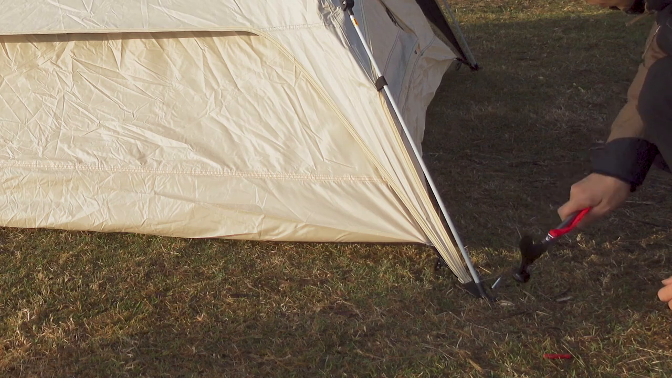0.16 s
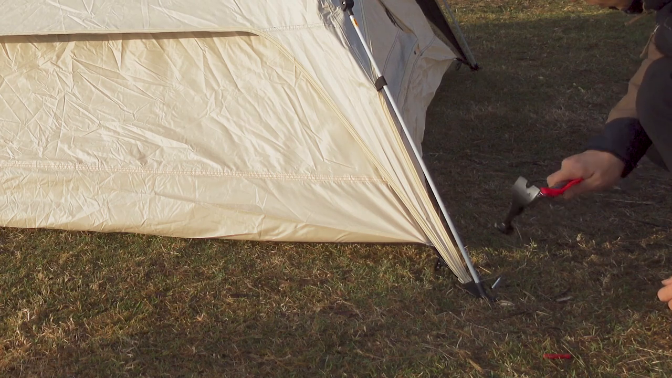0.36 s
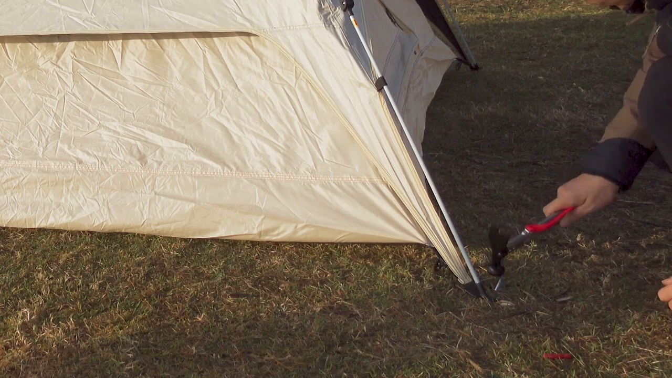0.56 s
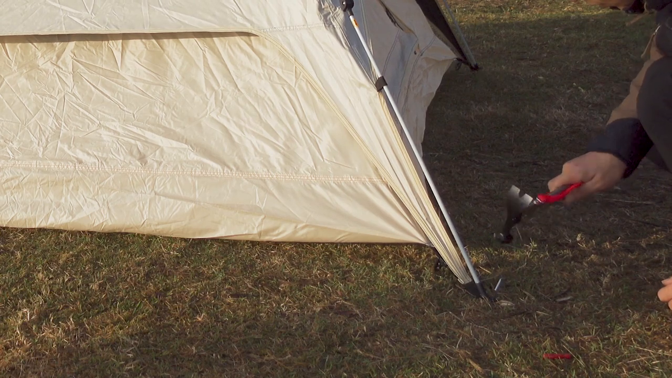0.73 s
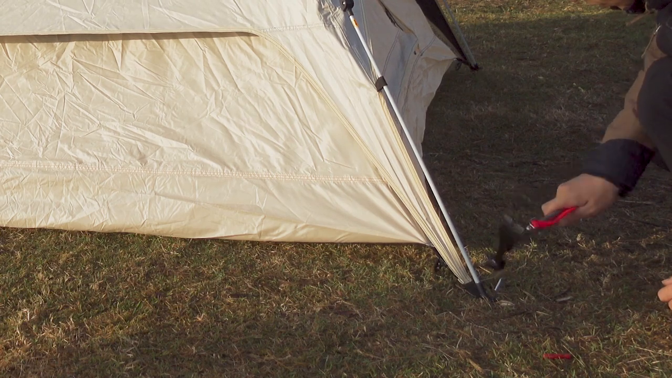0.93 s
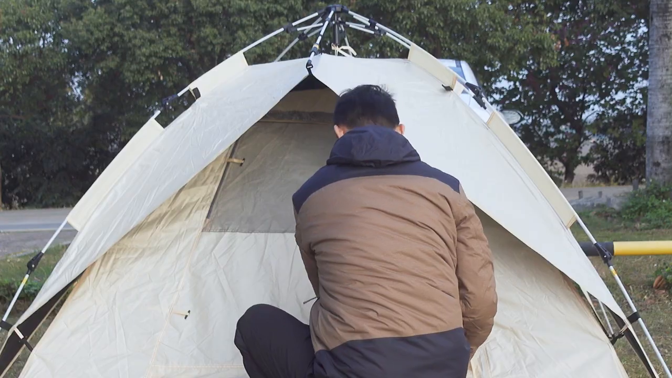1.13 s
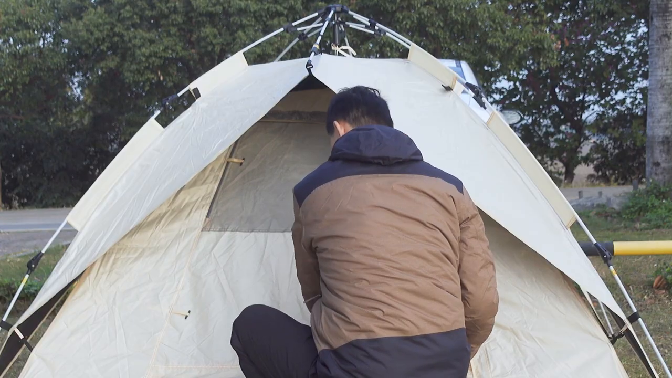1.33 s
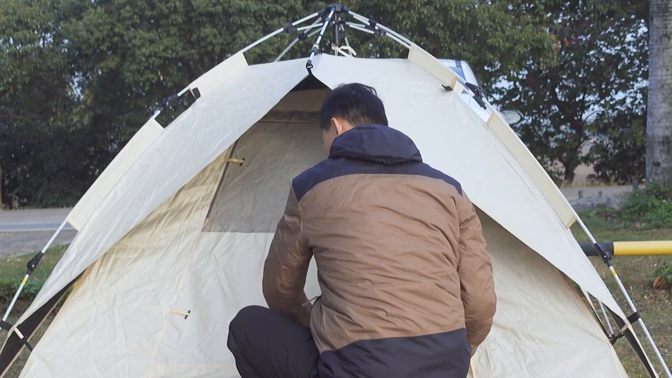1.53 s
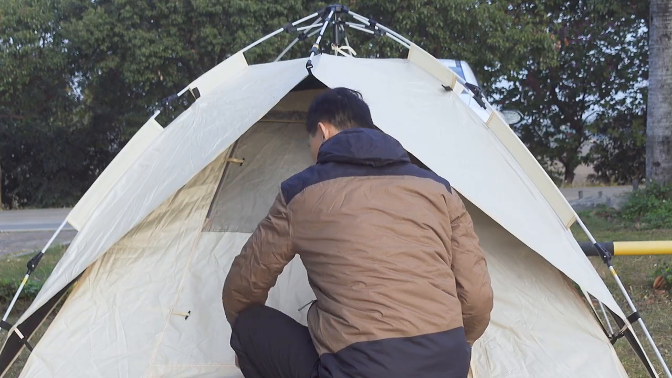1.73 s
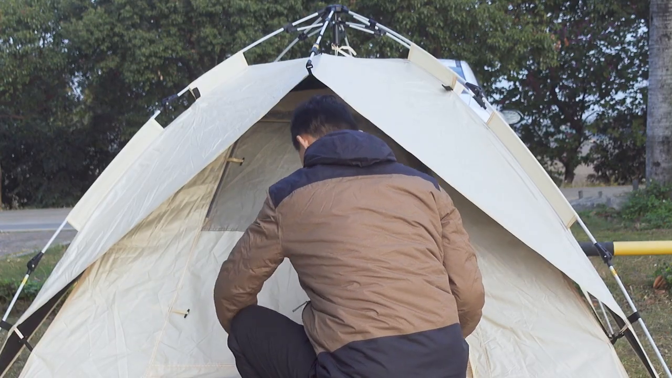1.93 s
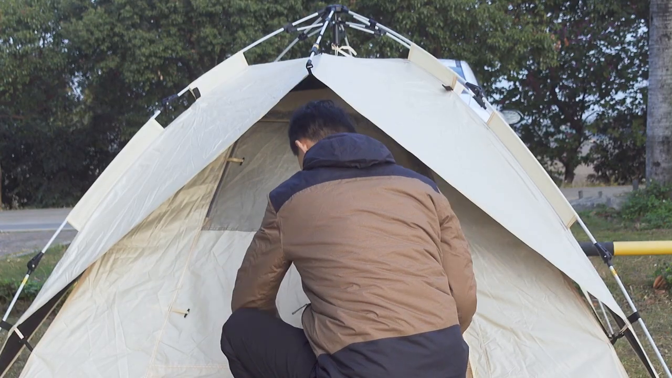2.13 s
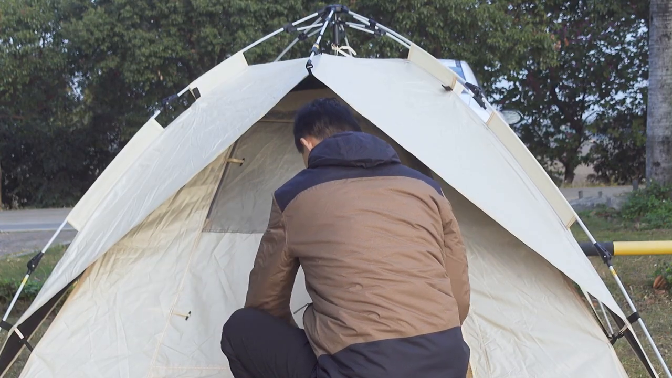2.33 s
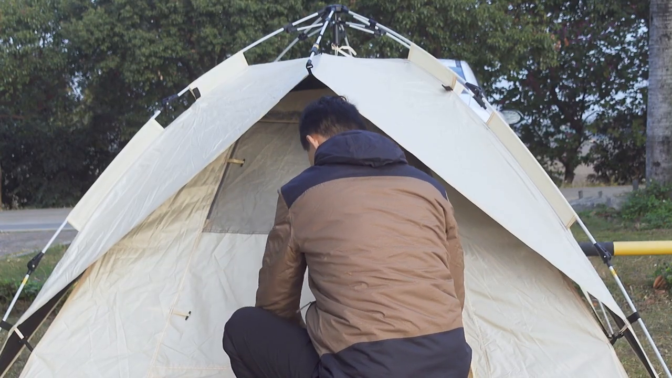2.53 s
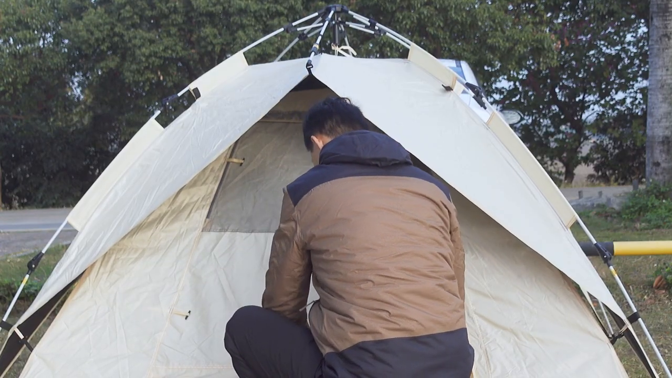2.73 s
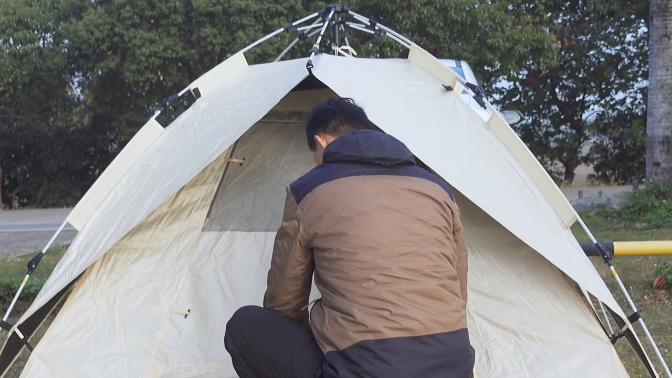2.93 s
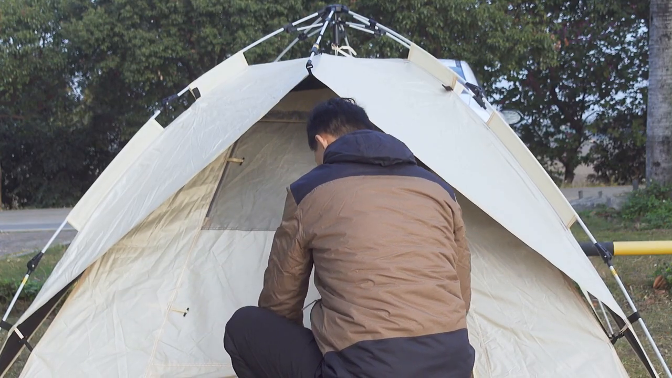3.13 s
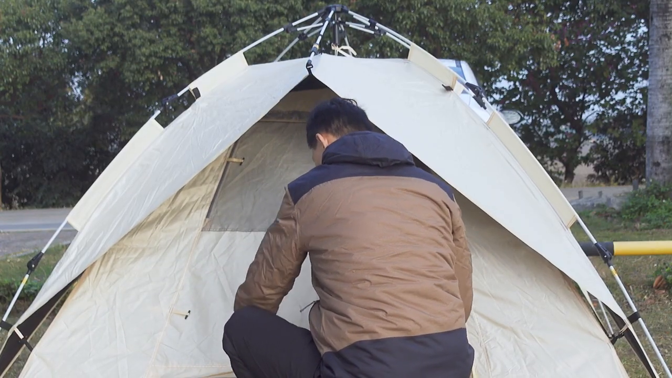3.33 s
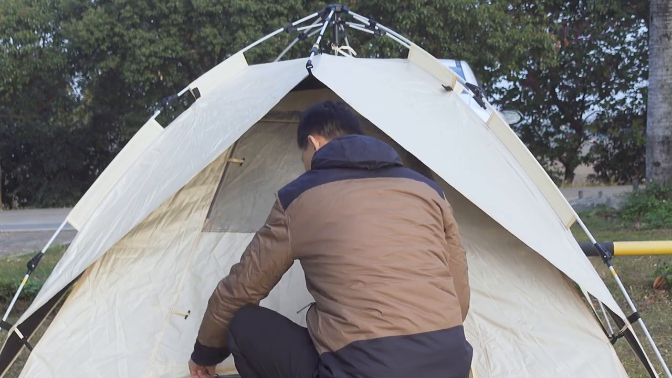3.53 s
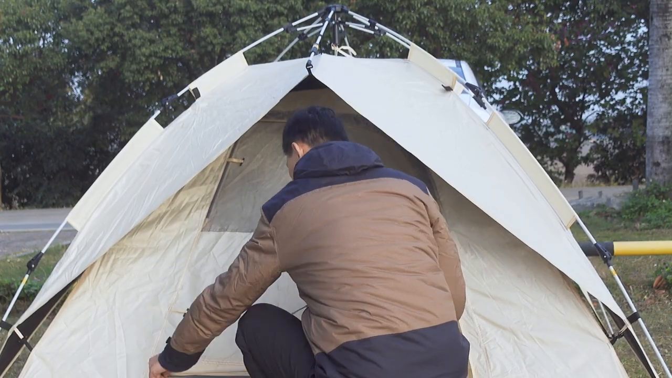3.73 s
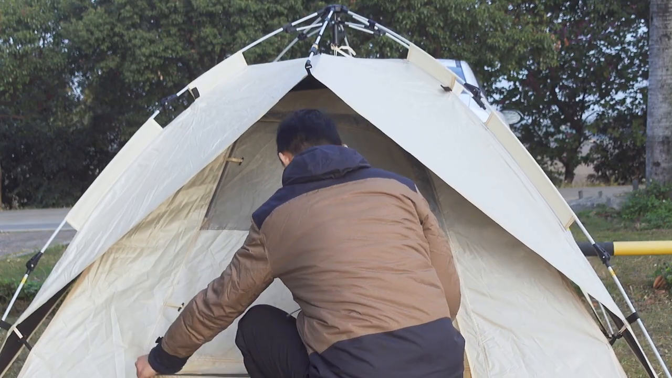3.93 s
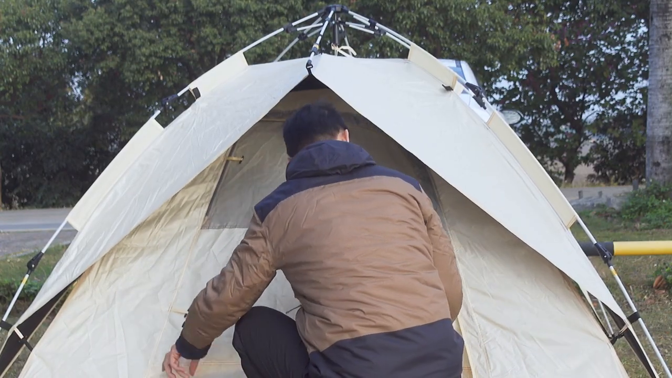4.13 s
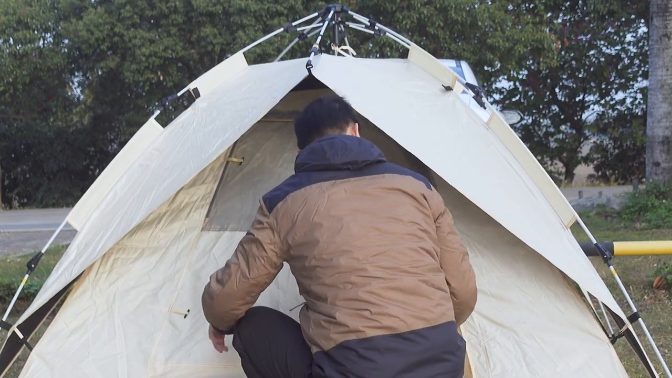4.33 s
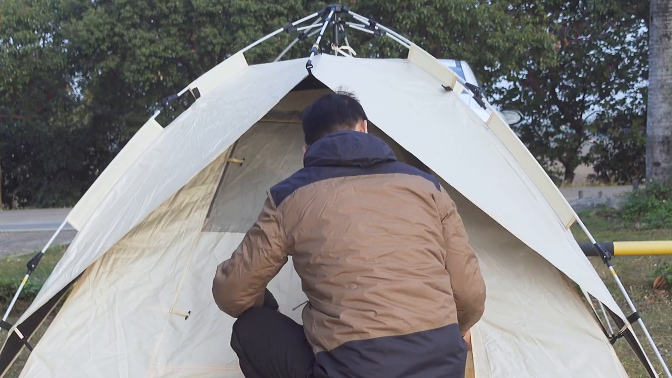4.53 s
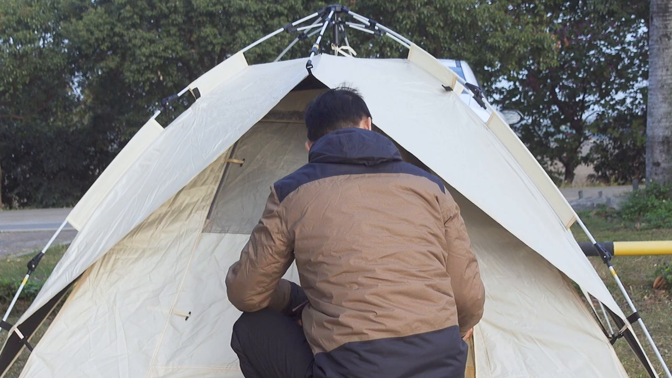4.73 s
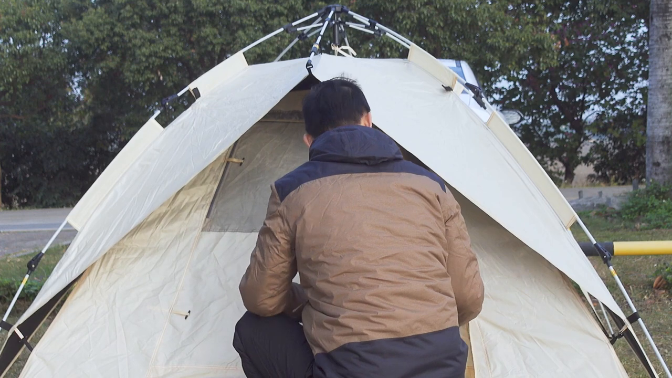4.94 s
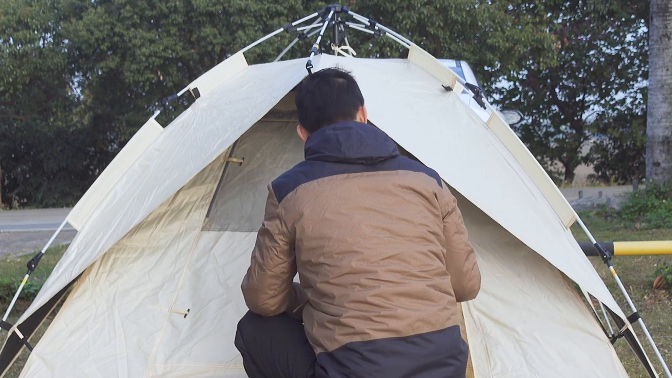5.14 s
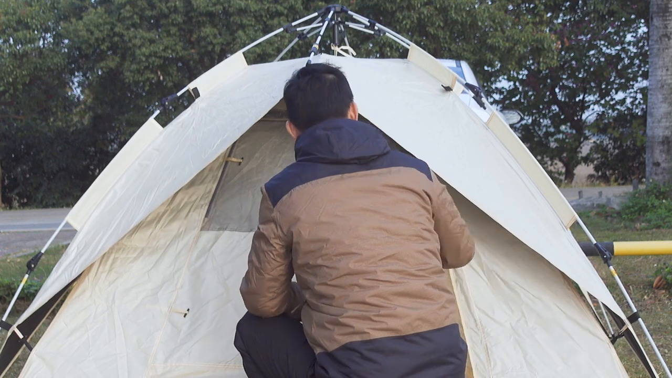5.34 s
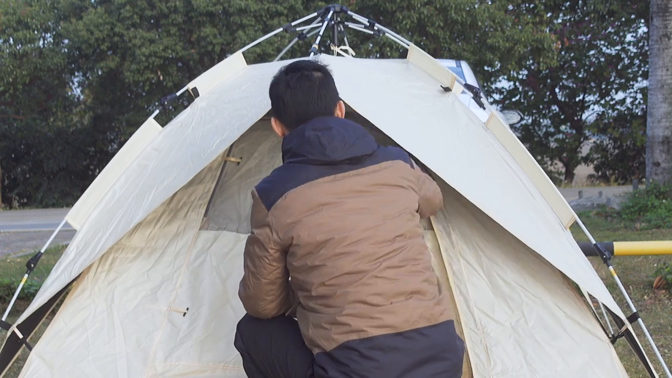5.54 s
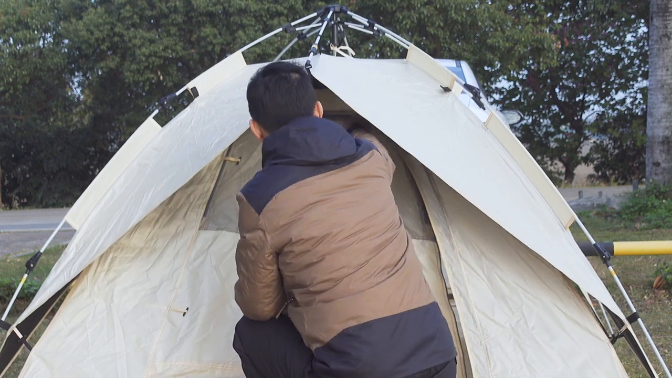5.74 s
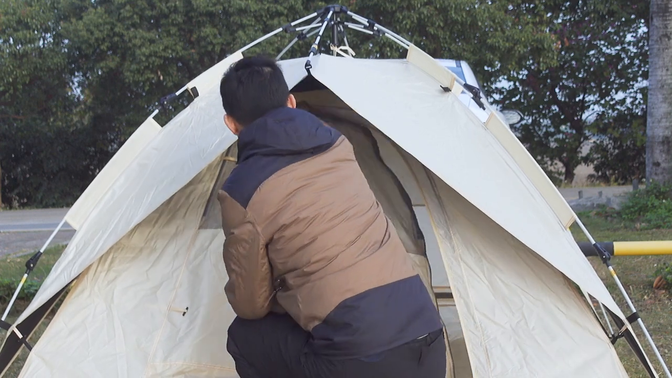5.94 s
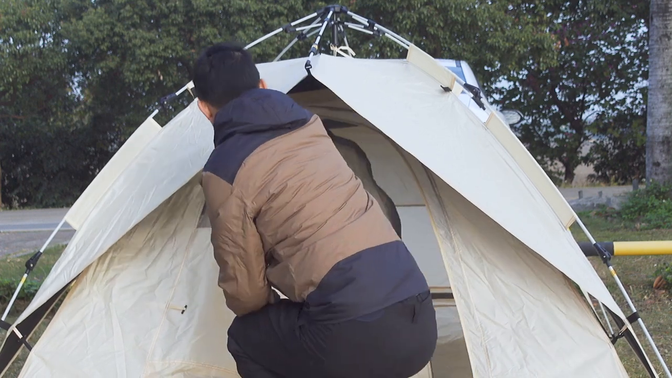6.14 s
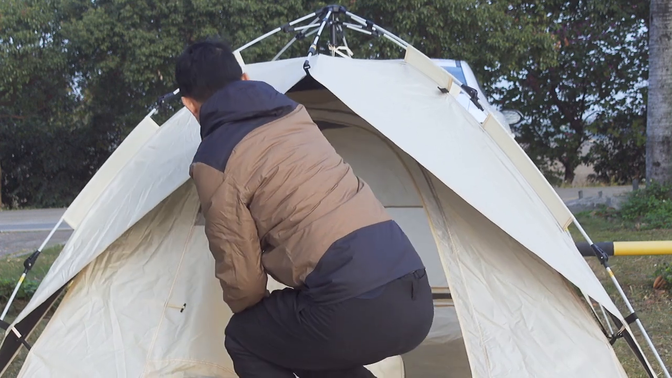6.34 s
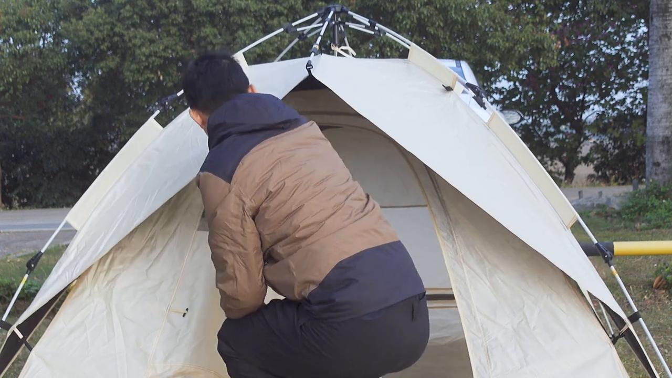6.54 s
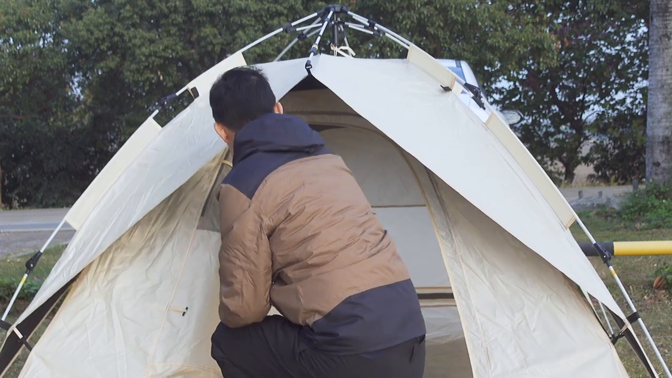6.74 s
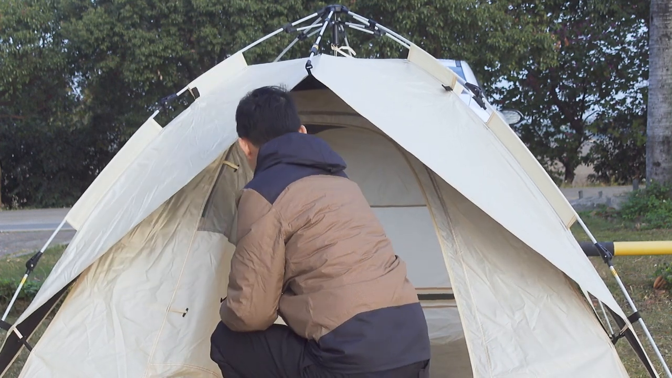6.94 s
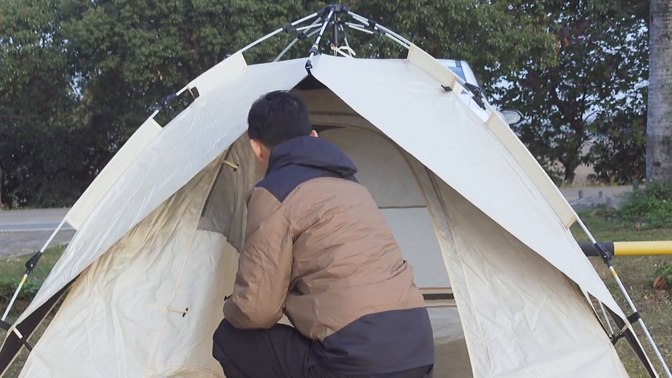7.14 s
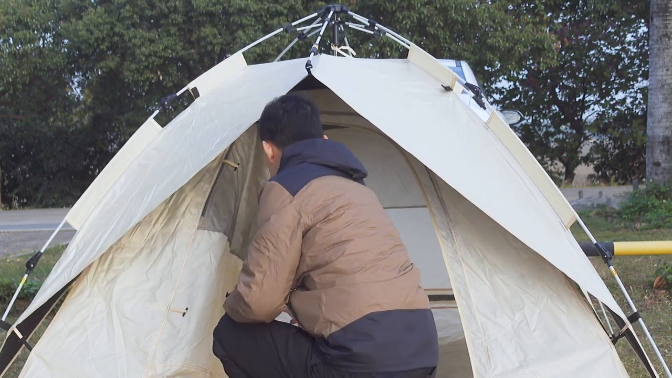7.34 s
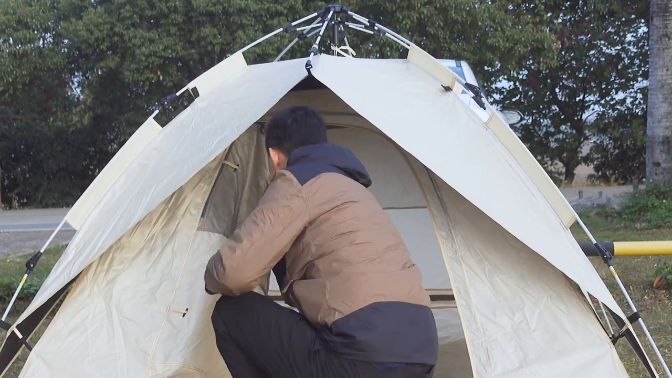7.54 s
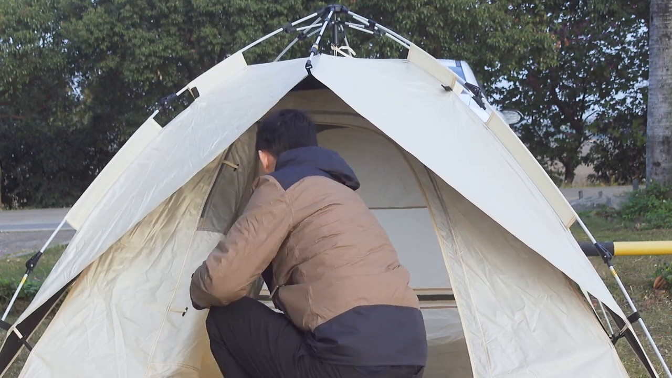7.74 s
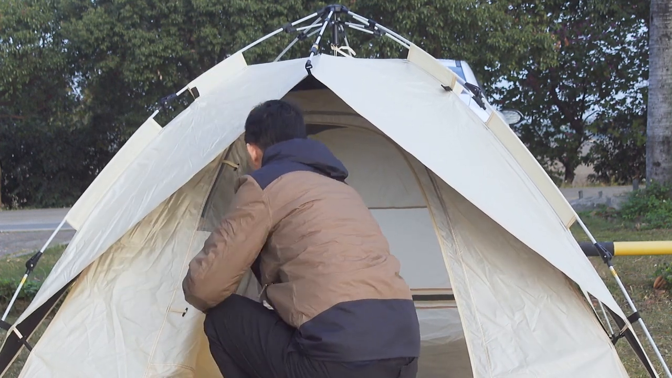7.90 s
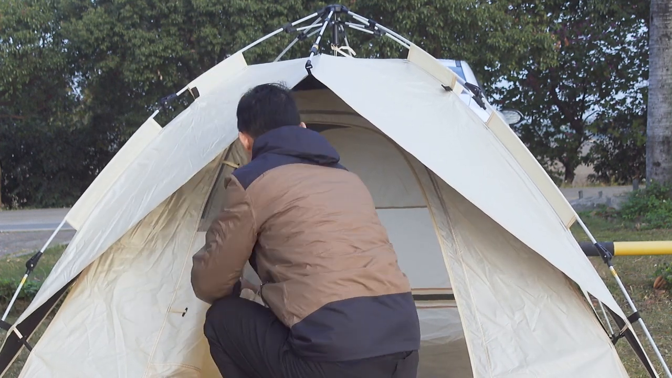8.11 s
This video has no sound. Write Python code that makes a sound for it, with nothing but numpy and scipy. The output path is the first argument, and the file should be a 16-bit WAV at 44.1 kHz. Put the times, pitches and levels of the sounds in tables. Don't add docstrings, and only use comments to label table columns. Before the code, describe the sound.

Loud metallic stake strikes outdoors cut abruptly to soft tent handling: rustling fabric, crisp little creases and three buzzing zip pulls over a low hum.

```python
import sys
import numpy as np
from scipy import signal
from scipy.fft import rfft, irfft
from scipy.io import wavfile
from scipy.ndimage import uniform_filter1d

SR = 44100
rng = np.random.default_rng(int(sys.argv[2]) if len(sys.argv) > 2 else 0)


def output_pcm(signal):
    pcm = np.clip(np.atleast_2d(signal).T, -1, 1) * 32767
    wavfile.write(sys.argv[1], SR, np.round(pcm).astype(np.int16))


def invert_db(x):
    u = np.asarray(x, float) / 20
    return 10 ** u


N = 360297
TIME = np.arange(N) / SR
SCENE_CHANGE_S = 1.101

BLOW_S = [.1567, .6332, 1.0709]
# [f/Hz, level/dB]
WEAVE = [(8000, -16), (9200, 1.5), (11500, 0), (13500, 4.5), (14800, 7), (16000, 1.5)]


def unit(x):
    return x / np.sqrt(np.mean(x ** 2))


def colour(x, points):
    hz, db = np.transpose(points)
    bins = np.maximum(np.fft.rfftfreq(len(x), 1 / SR), 1)
    gain = invert_db(np.interp(np.log(bins), np.log(hz), db))
    return unit(irfft(rfft(x) * gain, len(x)))


def walk(rate):
    hold = int(SR / rate)
    steps = np.repeat(rng.standard_normal(N // hold + 1), hold)
    smooth = uniform_filter1d(uniform_filter1d(steps, hold), hold)
    return unit(smooth[:N])


def add(out, sound, s):
    i = int(s * SR)
    out[i:i + len(sound)] += sound[:N - i]


def grit(spread_db):
    slip_size = np.minimum(rng.exponential(1, N), 7)
    return rng.standard_normal(N) * invert_db(spread_db * slip_size)


def wind():
    # [t/s, rise/s, level/dB]
    puffs = [(0.037, 0.043, -48.5), (.18, 0.077, -44), (.52, 0.1, -49), (.61, .08, -40),
             (.68, 0.036, -54.5), (.87, 0.052, -57.5), (.97, 0.0214, -57), (1.074, 0.026, -48)]
    # [f/Hz, level/dB]
    rumble = [(24, -39), (40, -2.5), (203, -1), (247, -8), (279, -5.5), (460, -19), (713, -47),
              (1500, -52.5), (1950, -89.5), (3300, -120)]
    # [f/Hz, level/dB]
    hiss = [(290, -25), (500, -2.5), (561, -7.5), (667, -12.5), (2280, -21.5), (2830, -15.5), (2950, -21.5),
            (15800, -29.5)]
    breeze_db, fall_s = -58, 0.054
    field_db, hiss_in_puff_db = -69, -27.5

    push = invert_db(breeze_db)
    for s, rise, db in puffs:
        growing = np.clip(1 + (TIME - s) / rise, 0, 1)
        dying = np.exp((s - np.maximum(TIME, s)) / fall_s)
        push = push + invert_db(db) * np.where(TIME < s, growing, dying)
    gusty = invert_db(2.5 * walk(45))
    buffets = push * gusty * colour(rng.standard_normal(N), rumble)
    hiss_level = invert_db(field_db + 1.5 * walk(3.4)) + invert_db(hiss_in_puff_db) * push
    return buffets + hiss_level * colour(rng.standard_normal(N), hiss)


def country_hum():
    # [f/Hz, level/dB]
    hum = [(18, -49), (30, -3), (93, 1), (193, 1), (343, -6.5), (1060, -25.5), (1610, -25.5), (3360, -24),
           (3830, -29), (7760, -29), (12400, -53), (14600, -48.5), (15800, -37.5)]
    level_db = -53.5
    return invert_db(level_db + 0.73 * walk(2.3)) * colour(rng.standard_normal(N), hum)


def scuffs():
    # [t/s, length/s, centre f/Hz, width/Hz,
    # level/dB]
    drags = [(1.239, 0.11, 352.6, 300, -49), (1.701, 0.027, 1510, 2650, -40.5),
             (2.145, 0.16, 1470, 250, -52.5), (2.979, 0.096, 336, 294, -48), (4.648, 0.46, 845, 400, -60),
             (7.506, 0.28, 2600, 900, -56), (7.685, 0.066, 600, 503, -47.5), (8.036, 0.15, 358, 400, -51)]
    out = np.zeros(N)
    for s, length, hz, width, db in drags:
        swell = np.sin(np.pi * np.clip((TIME - s) / length, 0, 1) ** .6)
        band = [(hz / 3, -40), (max(hz - width / 2, hz / 2), -3), (hz + width / 2, -3), (hz + 3 * width, -30)]
        out += invert_db(db) * swell * colour(grit(3.0), band)
    return out


def ticks():
    # [t/s, knock level/dB, snap above knock/dB, spit above knock/dB]
    clear_ticks = [(1.253, -37, -10, -13), (1.348, -34, -1, -13), (1.778, -36.5, -3.5, -12.5),
                   (1.897, -44, -2.5, 6), (2.517, -50, 13, 7), (2.541, -43.5, 10.5, 17),
                   (2.874, -39.5, -0.5, -16), (2.929, -38.5, 1, -14), (2.961, -50, -9, -10.5),
                   (2.978, -39, 0, -7.5), (3.039, -33, -11, -19), (3.099, -45.5, -4, -18.5),
                   (3.991, -31, -9, -24.5), (4.034, -49.5, 0.5, -19), (4.065, -33, -8, -10.5),
                   (4.111, -39.5, 3, -21), (4.179, -43, 2, -15), (4.237, -33.5, -11, -22.5),
                   (4.337, -49, 4, -15), (4.505, -50, 6, -18), (5.119, -37.5, -13.5, -15),
                   (5.812, -38, -6, -21), (6.727, -30, -15, -27), (7.097, -35.5, -12, -27),
                   (7.194, -46, -7.5, -21), (7.25, -39, -15, -22), (7.357, -35.5, -9.5, -30),
                   (7.403, -41.5, -12.5, -20.5), (7.982, -31.5, 4, -19.5), (8.047, -28.5, -5.5, -19)]
    # [f/Hz, level/dB]
    snap_colour = [(1000, -41), (2000, 2.5), (3300, 2), (5000, -3.5), (7000, 1), (9000, -22)]
    knock_low_hz, knock_octaves = 474, 1.83
    small_per_s, small_db, small_spread_db = 45, -48.5, 2.5
    small_snap_db, small_spit_db = -10, -22

    when = np.arange(SCENE_CHANGE_S + .12, N / SR - .05, 1 / small_per_s)
    small_ticks = []
    for s, (a, b, c, d) in zip(when, rng.standard_normal((len(when), 4))):
        late = abs(a) / small_per_s
        small_ticks.append((s + late, small_db + small_spread_db * b, small_snap_db + 3 * c, small_spit_db + 4 * d))

    out, t = np.zeros(N), TIME[:SR // 40]
    fast = np.exp(-t / .001)
    for s, db, snap_db, spit_db in list(clear_ticks) + small_ticks:
        hz = knock_low_hz * 2 ** (knock_octaves * rng.random())
        noise = rng.standard_normal(len(t))
        knock = np.sin(2 * np.pi * hz * t) * np.exp(-t * hz / 1.2)
        snap = colour(noise, snap_colour) * fast
        spit = colour(noise, WEAVE) * fast ** 2
        snap = invert_db(snap_db + 6) * snap / abs(snap).max()
        spit = invert_db(spit_db + 6.5) * spit / abs(spit).max()
        add(out, invert_db(db - 0.5) * (knock + snap + spit), min(s, 8.1))
    return out


def nylon():
    # [t/s, length/s, swish level/dB, folds above swish/dB, weave above swish/dB]
    strokes = [(1.183, 0.39, -51, -6.5, -2.5), (1.383, 0.4, -48.5, -5.5, -3), (1.71, 0.28, -55, -6, 0),
               (2.01, .5, -49.5, -6.5, -3), (2.397, .4, -54, -3.5, -3), (2.748, 0.29, -59, 0.5, -2),
               (3.018, 0.093, -56.5, 10, -10), (3.135, .3, -48.5, -4, -2.5), (3.349, .6, -50.5, -2.5, 0),
               (3.948, 0.28, -61.5, 4.5, -4), (4.125, .33, -61, -0.5, -1.5), (4.598, .5, -52, -4.5, 1),
               (5.122, .5, -51.5, -3, -2.5), (5.494, .85, -53.5, 1.5, -1.5), (6.41, 0.247, -63.5, 5, -8),
               (6.673, 0.084, -51.5, -2.5, -12), (6.998, 0.54, -63.5, 1.5, -4),
               (7.438, 0.25, -51, -5, -6.5), (7.671, 0.84, -56, -5, -2.5), (7.918, .3, -52, 0, -5.5)]
    # [f/Hz, level/dB]
    swish_colour = [(3000, -1.5), (3800, -5), (5000, 3), (6500, 2.5), (8500, 2), (9500, -15)]
    # [f/Hz, level/dB]
    fold_colour = [(120, -54), (220, -8), (350, -4.5), (800, 3), (1400, 5), (2200, -11.5), (3300, 2),
                   (4200, -15.5), (6000, -33)]
    attack_s, release_s, sag_db_per_s, rest_db = 0.099, 0.04, -5.5, -67

    swish, folds, weave = np.full((3, N), invert_db(rest_db))
    for s, length, db, folds_db, weave_db in strokes:
        t = np.clip(TIME - s, 0, length)
        swell = np.clip(np.minimum(t / attack_s, (length - t) / release_s), 0, 1)
        rub = invert_db(db + sag_db_per_s * t) * swell
        swish = np.maximum(swish, rub)
        folds = np.maximum(folds, rub * invert_db(folds_db))
        weave = np.maximum(weave, rub * invert_db(weave_db))

    slips, creases = grit(1.2), grit(3)
    flicker = invert_db(.9 * walk(30))
    swishing = swish * colour(slips, swish_colour)
    hissing = weave * invert_db(1.1 * walk(6)) * colour(slips, WEAVE)
    crackling = folds * invert_db(1.8 * walk(45)) * colour(creases, fold_colour)
    return flicker * (swishing + hissing + crackling)


def follow(table):
    s, *columns = np.transpose(table)
    gate = np.clip(np.minimum(TIME - s[0], s[-1] - TIME) / .004 + 1, 0, 1)
    return [gate] + [np.interp(TIME, s, column) for column in columns]


def flexing_tape(x):
    patchy_db, bands = 5, 8
    octave = np.log2(np.maximum(np.fft.rfftfreq(N, 1 / SR), 1) / 400)
    place = np.clip(octave / .45, 0, bands - 1)
    spectrum, out = rfft(x), 0
    for k in range(bands):
        band = irfft(spectrum * np.clip(1 - abs(place - k), 0, 1), N)
        out = out + invert_db(patchy_db * np.minimum(walk(45), .7)) * band
    return out


def zips():
    # [t/s, teeth per second/Hz, level/dB]
    pulls = [
        [(1.24, 173.0, -54), (1.26, 191.1, -45.5), (1.306, 221.9, -48.5), (1.402, 351.3, -40),
         (1.436, 440.1, -43.5), (1.532, 644.3, -42.5), (1.562, 641.8, -44), (1.614, 768.1, -38.5),
         (1.684, 798.1, -45)],
        [(3.25, 240.5, -56), (3.308, 383.8, -42), (3.366, 493.7, -38.5), (3.422, 576.3, -43), (3.5, 579.2, -42),
         (3.816, 426.9, -45), (3.834, 387.3, -49), (3.86, 392.6, -43.5), (3.925, 465.1, -44.5)],
        [(5.11, 384.7, -61), (5.174, 408.3, -42), (5.274, 613.2, -44.5), (5.474, 755.0, -43.5),
         (5.662, 756.7, -47), (5.732, 585.4, -46.5), (5.984, 691.7, -50.5), (6.236, 483.0, -53),
         (6.27, 435.9, -62)],
    ]
    snags = [(1.4, .7), (.9, 1.1), (.7, 2.2)]
    # [f/Hz, level/dB]
    slider = [(120, -50), (230, -9), (340, 1), (750, 0), (1300, -3), (2300, -6), (3300, -5), (4500, -14),
              (8000, -31), (16000, -35)]
    scatter, scatter_db = .028, 2.2
    wobble, surge = .024, .015
    tape_ring_s = .0016

    out, t = 0, TIME[:256]
    for pull, snag in zip(pulls, snags):
        gate, hz, db = follow(pull)
        rough = np.interp(np.cumsum(gate) / gate.sum(), (0, 1), snag)
        speed = gate * hz * (1 + wobble * walk(100) + surge * rough * walk(55))
        teeth = np.cumsum(speed) / SR
        at = np.interp(np.arange(1, int(teeth[-1])), teeth + TIME * 1e-6, np.arange(N))
        chance = rng.standard_normal((len(at), 2)).clip(-1.8, 1.8)
        chance = chance * np.linspace(*snag, len(at))[:, None]
        at = at + scatter * chance[:, 0] * SR / hz[at.astype(int)]
        size = invert_db(scatter_db * chance[:, 1])
        whole = at.astype(int)
        clicks = np.bincount(whole, size * (whole + 1 - at), N)
        clicks = clicks + np.bincount(whole + 1, size * (at - whole), N)
        tape = rfft(rng.standard_normal(len(t)) * np.exp(-t / tape_ring_s), N)
        clicks = irfft(rfft(clicks) * tape / abs(tape), N)
        out = out + colour(clicks, slider) * np.sqrt(np.mean(gate)) * invert_db(db - 0.5)
    return flexing_tape(out)


def long_ring():
    ring_hz = [3012, 2758]
    # [from t/s, to t/s, level/dB]
    first_swells = [(-.15, .13, -39), (.127, 0.29, -38), (0.273, 0.37, -42), (.385, 0.399, -65)]
    # [from t/s, to t/s, level/dB]
    second_swells = [(0.609, 0.786, -26.5), (0.772, 0.948, -39.5), (0.93, 1.053, -53.5),
                     (1.046, 1.156, -49)]
    sag_db_per_s, before_blow_db = -42.5, -28

    out = 0
    for hz, swells in zip(ring_hz, (first_swells, second_swells)):
        tone = np.sqrt(2) * np.sin(2 * np.pi * hz * TIME)
        for start, end, db in swells:
            faint_db = sum(before_blow_db * (TIME < s) for s in BLOW_S[:2] if start < s < end)
            sag_db = sag_db_per_s * np.clip(TIME - start, 0, 1)
            swell = np.sin(np.pi * np.clip((TIME - start) / (end - start), 0, 1))
            out = out + swell * invert_db(db + sag_db + faint_db) * tone
    return out


def ringing(hz, db, t60, t):
    phase = rng.uniform(0, 2 * np.pi, (len(hz), 1))
    tones = np.sin(2 * np.pi * hz[:, None] * t + phase)
    fades = 1000 ** (-t / t60[:, None])
    return np.sum(invert_db(db)[:, None] * tones * fades, axis=0)


def hammer():
    # [peak level/dB, scatter level/dB, scatter t60/s, rebound delay/s, rebound level/dB]
    blows = [
        (-9, -26.5, .06, 0.0047, -8),
        (-9, -33, 0.091, 0.00082, -13),
        (-6, -34.5, 0.033, .0012, -1),
    ]
    first_hz = [890, 3490, 3590, 4500, 6330, 7520, 7817, 8290, 8760, 8840, 9900, 10500, 11180, 13300]
    second_hz = [1350, 2780, 3260, 3560, 4140, 5582, 5800, 6680, 7181, 8043, 9175, 10272, 12650, 13850]
    # [crack/dB, crack t60/s, after-ring/dB, its t60/s]
    strike_one = [(-6.5, 0.012, -32, .07), (-4, 0.021, -24.5, 0.06), (-1, .012, -22, 0.058),
                  (-14, .008, -35.5, 0.058), (-3.5, .012, -38.5, .12), (-12, .01, -38.5, .14),
                  (-3, .012, -37, .16), (-6.5, .012, -58, .1), (-14, .01, -24, 0.064),
                  (-13.5, .01, -35, .24), (2.5, .014, -33, .11), (-5, .01, -37.5, .05), (2, .014, -37, .17),
                  (-18, .008, -52, .09)]
    # [crack/dB, crack t60/s, after-ring/dB, its t60/s]
    strike_two = [(-12.5, .008, -40.5, .05), (-2, 0.0077, -40, .05), (-8, .008, -24.5, 0.051),
                  (-2.5, 0.008, -41, .05), (-6.5, 0.0068, -35.5, 0.065), (-5, 0.012, -36, .094),
                  (5, .007, -32, .09), (-1.5, .008, -36.5, .14), (-3.5, 0.016, -35, .2),
                  (-1, .012, -34, .15), (1.5, 0.0096, -40, .13), (-8.5, 0.033, -34, .2),
                  (-13, 0.01, -54, .05), (-19.5, .008, -53.5, .05)]
    # [crack/dB, crack t60/s, after-ring/dB, its t60/s]
    strike_three = [(-28.5, .008, -46.5, 0.046), (-7.5, .016, -28, 0.05), (-13, .009, -24, 0.073),
                    (-6, .006, -44, 0.038), (-9, 0.0025, -42.5, .05), (-11.5, 0.0026, -39.5, 0.076),
                    (3, .009, -32.5, .1), (-6.5, 0.02, -41.5, 0.054), (-12, .008, -42, 0.18),
                    (0.5, .014, -11, 0.055), (0, 0.02, -23.5, 0.029), (-13, 0.022, -20.5, .046),
                    (-21.5, .008, -44, .06), (-21, .008, -57.5, .05)]
    # [f/Hz, level/dB]
    scatter_colour = [(700, -14.5), (1000, -8), (2000, -13.5), (3500, -2.5), (5000, -6.5), (7500, 1),
                      (10500, -13.5), (12000, -29), (16000, -29.5)]
    # [f/Hz, level/dB]
    thud_colour = [(60, -28), (130, -7.5), (300, -4.5), (500, -2.5), (850, -7.5), (1300, -3.5), (2200, -19)]
    thud_db, thud_t60_s = -22, 0.033
    flutter_db, flutter_grows_s = 5, .05

    out, t = np.zeros(N), TIME[:SR // 3]
    contact = np.minimum(t / .00015, 1)
    stakes = map(np.array, (first_hz, second_hz, second_hz))
    strikes = (strike_one, strike_two, strike_three)
    for s, blow, hz, strike in zip(BLOW_S, blows, stakes, strikes):
        db, scatter_db, scatter_t60, lag, rebound_db = blow
        crack_db, crack_t60, ring_db, ring_t60 = np.transpose(strike)
        rebound = invert_db(db + rebound_db) * ringing(hz, crack_db, crack_t60, t)
        add(out, contact * rebound, s + lag)

        crack = ringing(hz, crack_db, crack_t60, t)
        flutter = invert_db(flutter_db * walk(70)[:len(t)] * np.minimum(t / flutter_grows_s, 1))
        after_ring = flutter * ringing(hz, ring_db + 2.0, ring_t60, t)
        steel = invert_db(db) * (crack + after_ring)
        fade = invert_db(scatter_db) * 1000 ** (-t / scatter_t60) + invert_db(scatter_db - 25) * 1000 ** (-t / .3)
        scatter = fade * colour(rng.standard_normal(len(t)), scatter_colour)
        thud = invert_db(thud_db) * colour(rng.standard_normal(len(t)), thud_colour) * 1000 ** (-t / thud_t60_s)
        add(out, contact * (steel + scatter + thud), s)
    return out


def scene():
    after = np.clip((TIME - SCENE_CHANGE_S) / .0005, 0, 1)
    hammering = wind() + long_ring() + hammer()
    tent_door = country_hum() + scuffs() + ticks() + nylon() + zips()
    return ((1 - after) * hammering + after * tent_door)[None]


def top_cut(x):
    return signal.sosfilt(signal.butter(12, 15900, fs=SR, output="sos"), x)


def record(dry):
    heard = signal.sosfilt(signal.butter(4, 46, "high", fs=SR, output="sos"), dry)
    return top_cut(np.clip(heard, -1, 1))


dry = scene()
out = record(dry)
output_pcm(out)
```